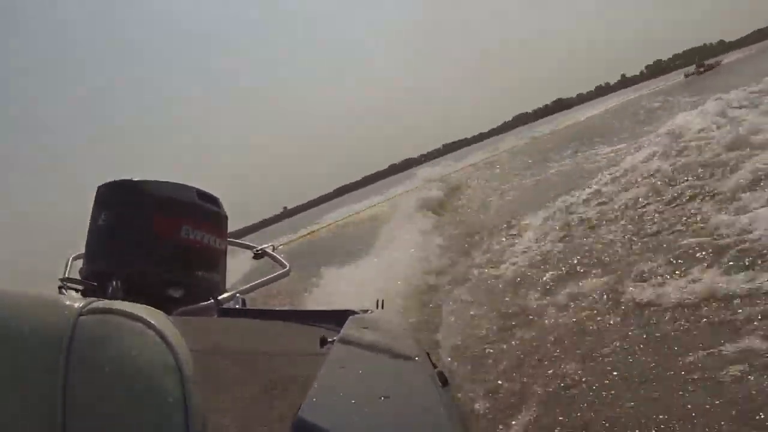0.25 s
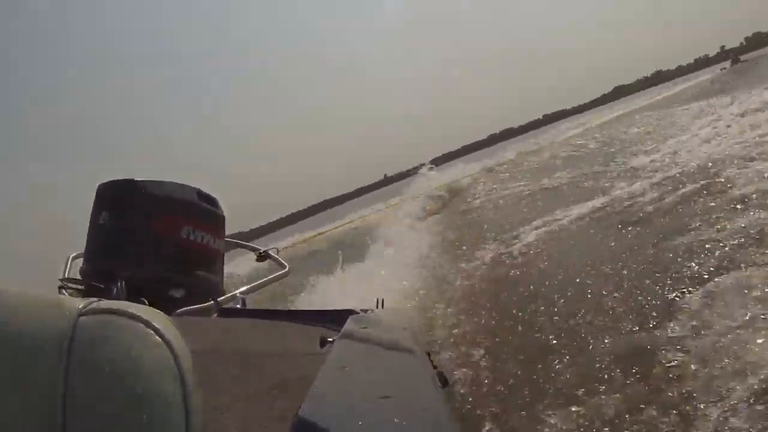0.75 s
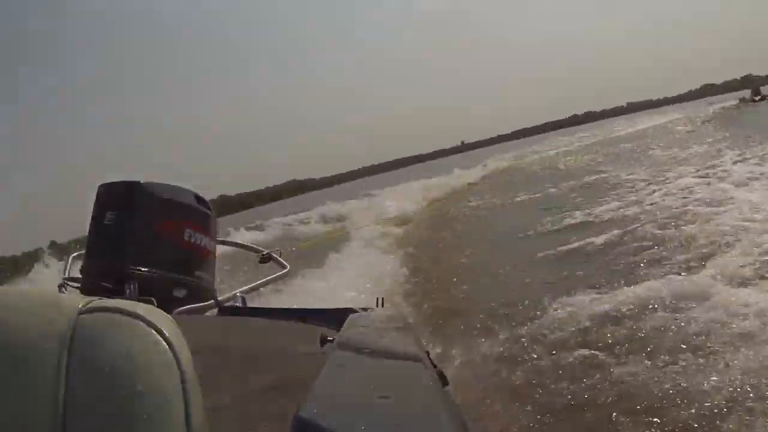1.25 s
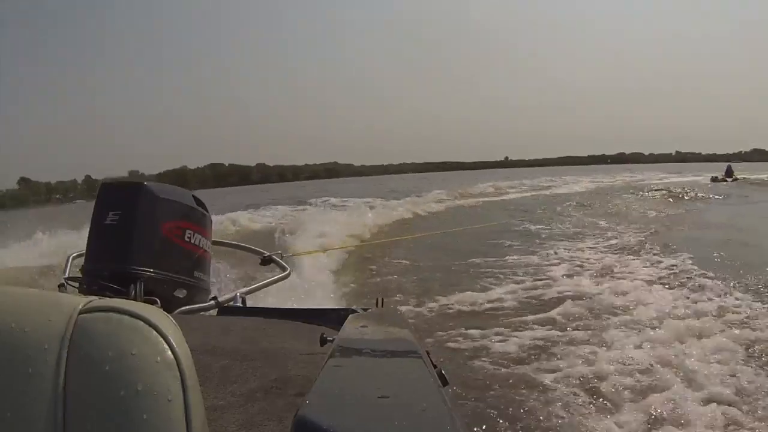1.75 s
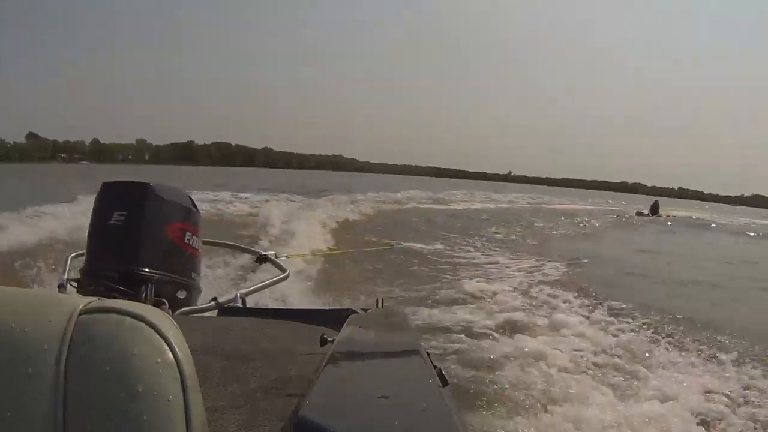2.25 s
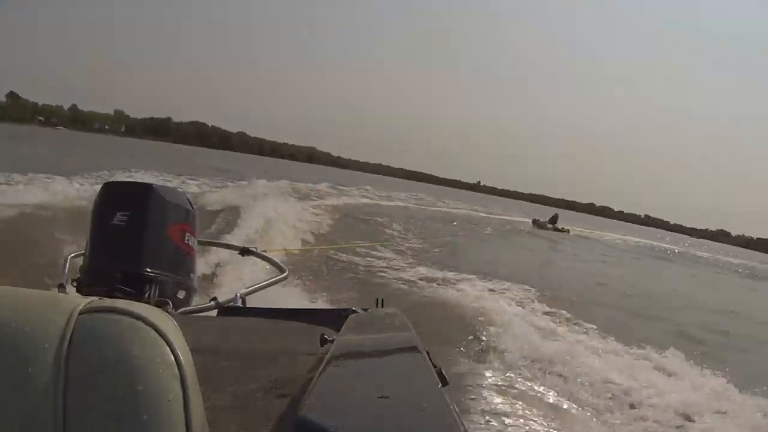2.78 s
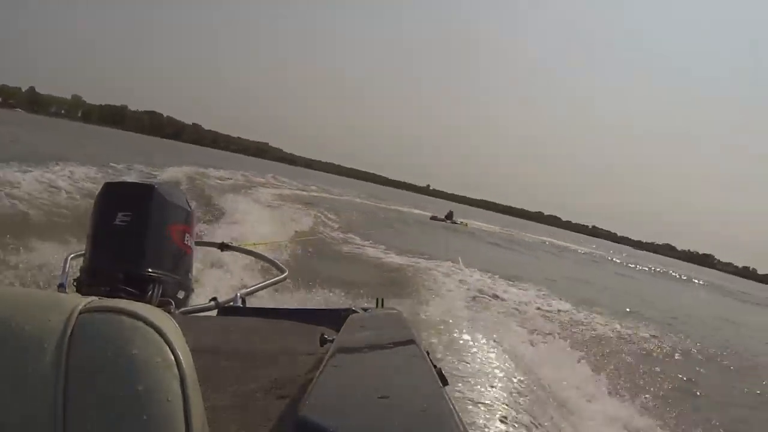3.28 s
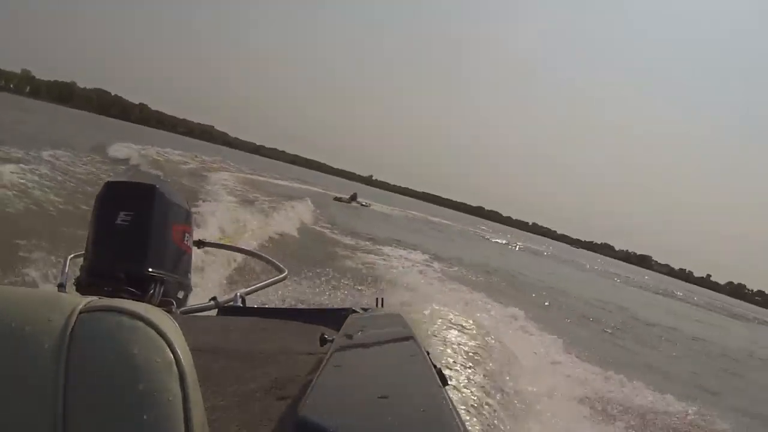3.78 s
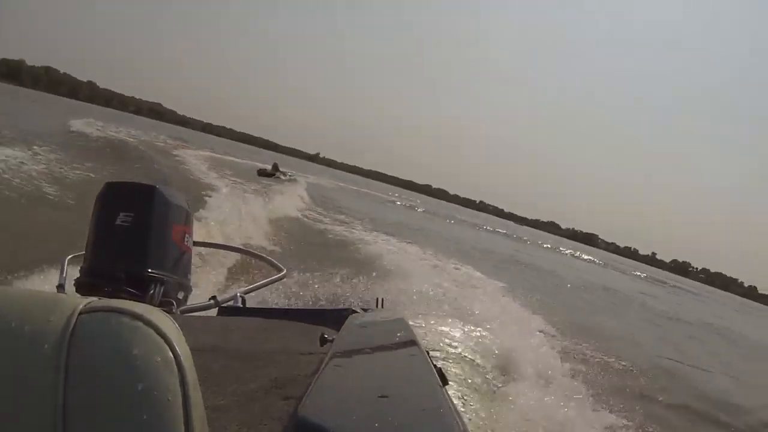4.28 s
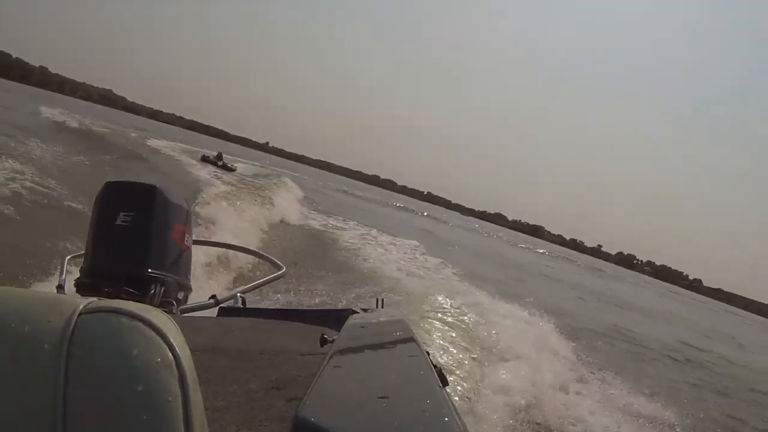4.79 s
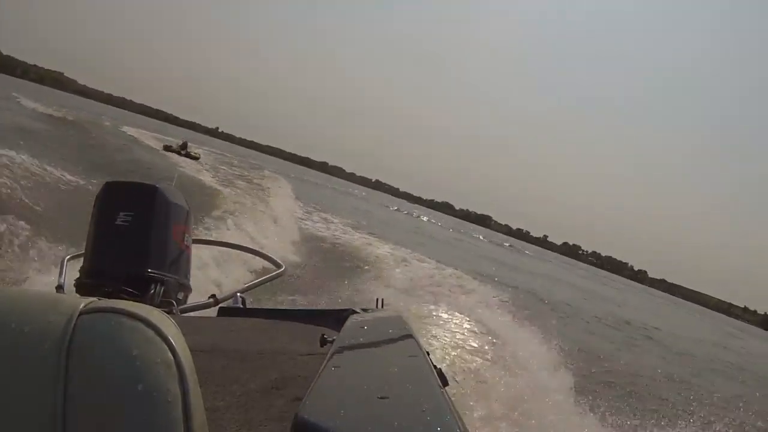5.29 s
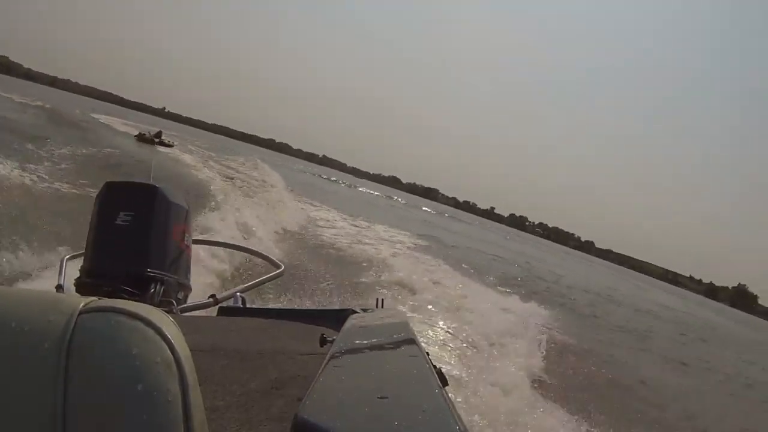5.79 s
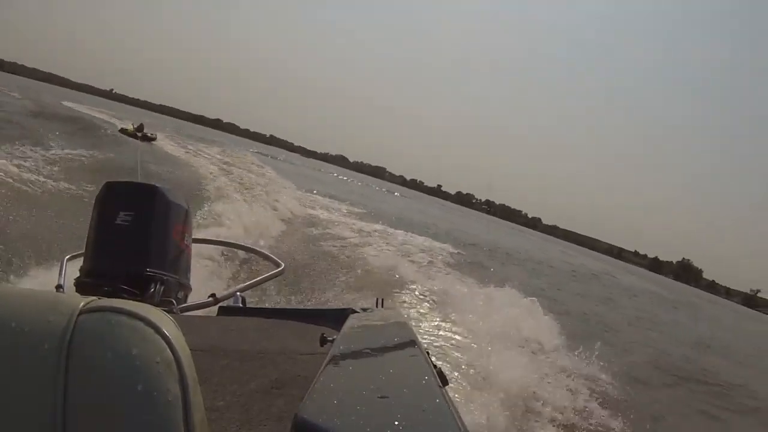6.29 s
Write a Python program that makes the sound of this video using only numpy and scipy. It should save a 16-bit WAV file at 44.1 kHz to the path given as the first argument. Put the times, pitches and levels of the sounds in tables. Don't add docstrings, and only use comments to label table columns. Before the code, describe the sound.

Inside a sealed camera case on a seat mount in an open motorboat, dense irregular knocks hammer for about a second and a half, each a low thump with a short hard plastic clack. They become sparse as the boat levels; the two-stroke outboard's buzzing drone swells, wake hiss rises thinly behind, the hull booms over waves, and a dull heavy slam lands at the very end.

```python
import sys
import numpy as np
from scipy import signal
from scipy.fft import rfft, irfft
from scipy.io import wavfile
from scipy.ndimage import uniform_filter1d

SR = 44100
rng = np.random.default_rng(int(sys.argv[2]) if len(sys.argv) > 2 else 0)


def makeup_ratio(level_db):
    decades = np.asarray(level_db, float) / 20
    return 10 ** decades


def to_wav(s):
    ch = np.atleast_2d(s).T
    pcm = np.round(np.clip(ch, -1, 1) * 32767)
    wavfile.write(sys.argv[1], SR, pcm.astype(np.int16))


N = 288409
FULL_DB = -21

# time in seconds, level in dB.
RIDE = [(0.0, -43), (0.16, -21), (0.31, -27), (1.16, -25), (1.35, -25.5), (1.89, -48), (2.18, -25),
        (2.31, -23), (2.55, -26), (2.71, -27), (2.97, -41), (3.2, -31.5), (4.15, -37.5), (4.5, -29),
        (4.66, -33), (5.57, -32), (5.94, -34.5), (6.54, -33)]
# frequency in Hz, level in dB, time to fall 60 dB in seconds.
BODY = [(138, -3.5, 0.11), (169.3, 2.5, 0.057), (197.7, -1.5, 0.091), (298, -5.5, 0.013)]
# frequency in Hz, level in dB, time to fall 60 dB in seconds.
SHELL = [(516, -20.5, 0.05), (680, 2, 0.015), (802, -2.5, 0.018), (1052, 1.5, 0.021), (1260, -7, 0.016),
         (1610, -6, 0.016), (1830, -14, 0.014), (2230, -3.5, 0.013), (2736, -10, 0.015),
         (3063, -21.5, 0.031), (4450, -16.5, .012), (5350, -17, 0.0085), (7200, -30, .005),
         (9240, -23.5, 0.0045), (10400, -22, 0.0036), (12770, -25, 0.0027), (14000, -21, .003)]


def evened(x):
    return x / np.sqrt(np.mean(abs(x) ** 2) + 1e-20)


def curves(rows):
    s, *columns = np.transpose(rows)
    return [np.interp(np.arange(N) / SR, s, c) for c in columns]


def read(points, hz):
    f, value = np.transpose(points)
    return np.interp(np.log(hz + 1), np.log(f + 1), value)


def wander(width_hz):
    rate = 400
    steps = rng.standard_normal((2, 3000))
    pole = np.exp(-np.pi * width_hz / rate)
    slow = evened(signal.lfilter([1], [1, -2 * pole, pole ** 2], steps[0] + 1j * steps[1]))
    return np.interp(np.arange(N) / SR * rate + 300, np.arange(3000), slow)


def noise(points, patchy_db, flicker_db, size):
    hop, hz = size // 4, np.fft.rfftfreq(size, 1 / SR)
    a, b, patches = rng.standard_normal((N // hop + 5, len(hz), 3)).T
    patches = uniform_filter1d(patches, size=6, axis=0)
    patches = evened(uniform_filter1d(patches, size=12, axis=1))
    flicker = evened(uniform_filter1d(rng.standard_normal(a.shape[1]), size=3))
    level_db = read(points, hz)[:, None] + patchy_db * patches + flicker_db * flicker
    z = (a + 1j * b) * makeup_ratio(level_db)
    return evened(signal.istft(z, nperseg=size, noverlap=size - hop)[1][:N])


def ring(modes, detune, rise):
    t = np.arange(4000) / SR
    sines = (makeup_ratio(db - 60 * t / t60) * np.sin(2 * np.pi * hz * d * t)
             for (hz, db, t60), d in zip(modes, detune))
    return (1 - np.exp(-t / rise)) * sum(sines)


def swells(rows, width):
    t = np.arange(N) / SR
    return sum(size * np.exp(-((t - s) / width) ** 2) for s, size in rows)


def panel_swells(rows):
    level_db, stretch = -6, 0.89
    t = np.arange(0, N, 50) / SR
    size = sum(makeup_ratio(db + level_db) * np.exp(-((t - s - length / 2) / (stretch * length / 2)) ** 2)
               for s, length, db in rows)
    return np.interp(np.arange(N) / SR, t, size)


def crank_orders(angle, speed, load_db):
    # multiple of crank speed, level in dB.
    crank = [(1, -5), (2, -6.5), (3, -6.5), (4, -41), (5, -1.5), (6, -4), (7, 4), (8, -3), (9, -17),
             (10, -39), (11, -12), (12, -9), (13, -9.5), (14, -11), (15, -33), (16, -22), (17, -34),
             (18, -22.5), (19, -50), (20, -51), (21, -51), (22, -23), (23, -31), (24, -19.5), (25, -24.5),
             (26, -24.5)]
    resonances = {5: (217.5, 6, -28, 0.5), 7: (311.5, 4, -20.5, 1.03), 11: (501, 5, -30.5, 1.6),
                  13: (606, 8, -30, 0.4), 14: (611.5, 12.5, -32.5, 0.34), 18: (804.5, 11, -38, 0)}
    # start in seconds, length in seconds, level in dB.
    side_panel = [(2.157, 0.097, -18.5), (2.366, 0.053, -28), (2.99, 0.049, -27), (3.072, 0.043, -16),
                  (3.337, 0.057, -19), (3.656, 0.059, -24), (3.784, 0.038, -27), (4.223, 0.16, -26),
                  (4.394, 0.15, -26), (4.641, 0.046, -20), (4.893, 0.054, -18.5), (4.967, 0.16, -20),
                  (5.142, 0.082, -29), (5.269, 0.058, -25), (5.368, 0.041, -30), (5.455, 0.034, -32),
                  (5.609, 0.03, -17), (5.654, 0.035, -15), (5.725, 0.041, -19), (5.82, 0.11, -25),
                  (5.91, 0.076, -23.5), (6.011, 0.026, -24), (6.218, 0.07, -16.5), (6.364, 0.14, -17)]
    # start in seconds, length in seconds, level in dB.
    deck = [(1.788, 0.054, -21), (1.971, 0.057, -24), (2.1, 0.144, -21), (2.388, 0.042, -22),
            (2.451, 0.21, -19), (2.669, 0.23, -19.5), (2.982, 0.066, -23), (3.403, 0.081, -24),
            (3.565, 0.072, -24), (3.723, 0.144, -20), (3.896, 0.034, -29), (4.02, 0.032, -25),
            (4.104, 0.053, -21), (4.237, 0.034, -26), (4.441, 0.067, -24), (4.595, 0.03, -26),
            (4.985, 0.05, -23), (5.056, 0.033, -26), (5.269, 0.038, -25), (5.348, 0.038, -26),
            (5.508, 0.11, -25), (5.61, 0.054, -20), (5.734, 0.19, -20), (6.081, 0.088, -22),
            (6.248, 0.04, -29), (6.325, 0.12, -25), (6.473, 0.034, -21)]
    singing = {13: side_panel, 5: deck}
    low, top, tones = np.zeros((3, N))
    for k, db in crank:
        turn = np.exp(1j * (k * angle + 2 * np.pi * rng.random()))
        drift = wander(width_hz=12)
        if k in resonances:
            hz, width, peak_db, share = resonances[k]
            lift = makeup_ratio(peak_db + share * load_db) / np.sqrt(1 + ((k * speed - hz) / width) ** 2)
            if k in singing:
                lift = lift + panel_swells(singing[k])
            tones += np.sqrt(2) * lift * (turn * (.98 + .15 * drift)).real
        elif k < 10:
            low += makeup_ratio(db) * (turn * (1.1 + 0.44 * drift)).real
        else:
            top += makeup_ratio(db) * (turn * (0.4 + 1.2 * drift)).real
    return low, top, tones


def propeller(angle):
    gear = 1.85
    # multiple of propeller speed, level in dB, wander in Hz.
    orders = [(3, -29, 7.3), (5, -33, 14)]
    return sum(makeup_ratio(db) * (np.exp(1j * k * angle / gear) * (1.12 + 0.43 * wander(width_hz=w))).real
               for k, db, w in orders)


def engine():
    # time in seconds, engine loudness reaching the seat in dB.
    load = [(0.0, -33.5), (0.16, -31), (0.31, -26), (0.46, -33), (0.89, -29.5), (1.26, -32.5), (1.49, -26),
            (1.66, -25), (1.99, -23), (2.93, -20), (3.08, -21.5), (3.88, -19), (4.9, -22.5), (5.1, -19.5),
            (6.25, -21.5), (6.54, -17.5)]
    # time in seconds, crank speed in Hz.
    crank_speed = [(0, 44.4), (1.4, 44.2), (1.8, 44.4), (2.3, 44.5), (2.8, 44.48), (3.0, 44.26),
                   (3.2, 44.4), (3.5, 44.8), (3.8, 45.0), (4.15, 44.64), (4.5, 45.14), (4.8, 44.76),
                   (5.1, 45.15), (5.45, 44.95), (6.0, 45.9), (6.22, 45.6), (6.38, 46.3), (6.54, 47.8)]
    # frequency in Hz, level in dB per Hz.
    hull = [(12, -37), (20, -23), (53, -23), (169, -22.5), (209, 1.5), (260, -13), (306, 5), (431, -20),
            (597, -3), (702, -21), (812, -15.5), (1060, -23), (1500, -31.5), (1950, -33.5), (3300, -120)]
    load_db, speed = curves(load)[0] - FULL_DB, curves(crank_speed)[0]
    roar_db = -19.5 + 0.93 * load_db
    rasp_db = -33.5 + 0.85 * load_db
    angle = 2 * np.pi * np.cumsum(speed) / SR
    low, top, tones = crank_orders(angle, speed, load_db)
    prop = propeller(angle)
    firing = 1 + 0.044 * np.cos(angle) + 0.043 * np.cos(2 * angle)
    roar = makeup_ratio(-1.5) * firing * noise(hull, patchy_db=1.0, flicker_db=1.5, size=2048)
    rasp_points = [(300, -6), (400, 0), (520, 2), (610, 7), (700, -9), (1100, -6), (1600, -33)]  # Hz, dB
    rasp = firing * noise(rasp_points, patchy_db=2.0, flicker_db=2.0, size=1024)
    lower = makeup_ratio(-5.0) * evened(low) + roar
    upper = makeup_ratio(-0.5) * evened(top) + makeup_ratio(-6.5) * rasp
    return makeup_ratio(roar_db) * lower + makeup_ratio(rasp_db) * upper + tones + makeup_ratio(0.13 * load_db) * prop


def knocks():
    # time in seconds, shell peak in dB, body in dB,
    # delay of the rebound in seconds (0 = none).
    hammering = [(-.0014, -26, -3, .0566), (.07, -30, -12, .0138), (.1092, -27, -11, .0282),
                 (.1505, -22.5, -4, .0154), (.1932, -26, -6.5, 0), (.2191, -20, -5, 0),
                 (.2336, -19, -4, .0141), (.2598, -21.5, -3.5, 0), (.2837, -18.5, -2, .0091),
                 (.3208, -27.5, -12, .0166), (.3614, -22, -4.5, 0), (.3891, -19, -2.5, .0229),
                 (.4345, -17.5, -5, .011), (.463, -19, -4, .0133), (.4995, -20.5, -5, .0088),
                 (.5227, -31, -11, .0246), (.6048, -23.5, -9, .0083), (.6309, -19, -1, .0343),
                 (.7178, -35, -8, .0082), (.7447, -20, -4.5, 0), (.7964, -29, -12, .0138),
                 (.83, -24, -9, .0088), (.8567, -18, -1, 0), (.8817, -23, -4.5, .0495),
                 (.9452, -21, -10, .0163), (.9685, -21, -9.5, .0144), (.9963, -24, -11, .0259),
                 (1.0466, -40, -6.5, .0089), (1.0635, -28, -18, .0134), (1.1357, -20.5, -5.5, .0257)]
    # time in seconds, shell peak in dB,
    # body in dB, delay of the rebound in seconds (0 = none).
    bumps = [(1.2057, -24.5, -10.5, .0265), (1.2471, -21, -7, 0), (1.2619, -20.5, -7, .0298),
             (1.3163, -26, -17, 0), (1.3593, -23.5, -9, .0143), (1.4213, -19.5, -6, .0245),
             (1.4644, -26, -20, .033), (1.5055, -23, -7.5, .0296), (1.8817, -25, -29, 0),
             (2.178, -22.5, -21, 0), (2.218, -21, -7, 0), (2.2479, -19.5, -8, 0),
             (2.2953, -20.5, -10, .0364), (2.5866, -21, -19, 0), (2.6564, -19.5, -7, 0),
             (2.9932, -19, -5, .0035), (3.078, -26, -19, 0), (3.1239, -18.5, -6, .004),
             (3.2311, -23, -8, 0), (3.2496, -19, -9, 0), (3.3753, -20.5, -7, 0), (3.4072, -20, -9, 0),
             (3.51, -23, -18, .0299), (3.7524, -19.5, -12, 0), (3.9071, -23.5, -6, 0),
             (3.9984, -19, -12, 0), (4.2114, -20.5, -22, 0), (4.9931, -17.5, -6, .0394),
             (5.248, -26.5, -20, 0), (6.3266, -33, -20, 0)]
    # time in seconds, peak in dB.
    light_taps = [(0.573, -33), (0.685, -24), (1.379, -20.5), (1.492, -24.5), (2.101, -31), (2.3673, -16),
                  (2.4094, -18), (2.4603, -23), (2.498, -37), (2.9378, -18), (3.3348, -18), (3.95, -36),
                  (4.2776, -18), (4.3477, -16), (4.3883, -22), (4.4493, -16), (4.7465, -24), (5.016, -27),
                  (5.0783, -32), (5.191, -39), (5.6203, -25), (5.9295, -33), (1.533, -42), (3.18, -26),
                  (3.4649, -21), (3.8654, -23), (4.046, -24), (5.3077, -19), (5.8889, -24)]
    tap_shell_db, tap_body_db = -8.5, -33
    rebound_shell_db, rebound_body_db, rebound_share = -27, -11, 0.22
    push_db, push_s, push_after_s = 8.5, 0.00065, 0.0038
    shell_lag_s = .0003

    hits = [row[:3] for row in hammering + bumps]
    for s, shell_db, _, gap in hammering + bumps:
        if gap:
            light_db = rebound_shell_db + rebound_share * (shell_db - rebound_shell_db)
            hits.append((s + gap, light_db, rebound_body_db))
    hits += [(s, db + tap_shell_db, tap_body_db) for s, db in light_taps]

    lead = 100
    out, t = np.zeros(N + 9000), np.arange(600) / SR
    push = np.exp(-((np.arange(4000) / SR - push_after_s) / push_s) ** 2)
    for s, shell_db, body_db in hits:
        detune = rng.standard_normal(len(SHELL) + len(BODY))
        chatter = rng.standard_normal(len(t)) * (rng.random(len(t)) < 700 / SR)
        blows = chatter * .4 * makeup_ratio(-60 * t / .04)
        struck_db = 2 * rng.standard_normal(len(SHELL))
        modes = [(hz, db + more, t60) for (hz, db, t60), more in zip(SHELL, struck_db)]
        shell = ring(modes, 1 + .04 * detune[len(BODY):], rise=.00033)
        shell = shell + signal.fftconvolve(blows, shell)[:len(shell)]
        shell = makeup_ratio(shell_db + 5.0) * shell / np.sqrt(1 + np.sum(blows ** 2))
        body = ring(BODY, 1 + .025 * detune, rise=.001)
        body = makeup_ratio(body_db - 7.0) * body - makeup_ratio(shell_db + push_db) * push
        out[round((s + shell_lag_s) * SR) + lead:][:len(shell)] += shell
        out[round(s * SR) + lead:][:len(body)] += body
    low_cut = signal.butter(2, 75, "high", fs=SR, output="sos")
    return signal.sosfilt(low_cut, out)[lead:][:N]


def mount():
    # start in seconds, length in seconds, level in dB, pitch in Hz.
    sways = [(-.05, 0.57, -16.5, 38.74), (.29, 0.3, -13, 36.8), (0.54, 0.5, -12, 36.9),
             (1.075, 0.26, -21.5, 36.9), (1.294, 0.34, -31, 34.8), (1.554, 0.051, -30, 32.6),
             (1.66, 0.38, -24.5, 33), (2.013, 0.067, -24, 33.9), (2.08, 0.12, -23, 34),
             (2.18, 0.085, -19, 34.3), (2.294, 0.35, -18.5, 33.96), (2.48, 0.69, -16, 33.98),
             (3.177, 0.24, -20, 36), (3.357, 0.13, -24, 34.6), (3.444, 0.46, -17, 34.5),
             (3.797, 0.08, -29, 35.2), (3.875, 0.89, -13, 32.92), (4.633, 0.025, -37, 38.3),
             (4.71, 0.39, -26, 36.5), (4.98, 0.47, -17, 34.7), (5.455, 0.81, -16.5, 32.8),
             (6.196, .15, -31, 30.8), (6.348, 0.65, -21, 33.14)]
    t = np.arange(N) / SR
    start, length, db, hz = np.transpose(sways)
    size = np.zeros(N)
    for s, l, d in zip(start, length, db):
        half_sine = np.sin(np.pi * np.clip((t - s) / l, 0, 1)).clip(0)
        size += makeup_ratio(d) * half_sine ** 0.76
    pitch = np.interp(t, start + length / 2, hz)
    sway = np.sqrt(2) * size * np.exp(2j * np.pi * np.cumsum(pitch) / SR)
    sway = (sway * (0.72 + 0.33 * wander(width_hz=8.3))).imag
    thump = ring(BODY, np.ones(len(BODY)), rise=0.0087)
    drone = signal.oaconvolve(rng.standard_normal(N), thump)[:N]
    return sway + makeup_ratio(curves(RIDE)[0] + 2) * evened(drone)


def rattle():
    heights_db = 4.5 * np.minimum(rng.exponential(1, (4, N)), 3.5)
    taps = makeup_ratio(heights_db) * (rng.random((4, N)) < 80 / SR)
    parts = 1 + .06 * rng.standard_normal((4, len(SHELL)))
    buzz = sum(signal.oaconvolve(x, ring(SHELL[2:], d, rise=0.00021))[:N] for x, d in zip(taps, parts))
    return makeup_ratio(-34.5 + 0.46 * (curves(RIDE)[0] - FULL_DB)) * evened(buzz)


def booms():
    # time in seconds, level in dB.
    waves = [(1.62, -26.5), (2.5, -41), (3.0, -37), (3.14, -23.5), (3.359, -22), (3.61, -25), (3.75, -25.5),
             (4.01, -25.5), (4.49, -27), (4.99, -29.5), (6.109, -27)]
    boom_hz, boom_s = 118.6, 0.092
    size = swells([(s, makeup_ratio(db)) for s, db in waves], boom_s)
    note = np.exp(2j * np.pi * boom_hz * np.arange(N) / SR)
    return np.sqrt(2) * size * (note * (1 + .25 * wander(width_hz=4.5))).real


def thuds():
    # start in seconds, length in seconds, level in dB, pitch in Hz.
    slams = [
        (6.486, 0.018, -2.5, 239),
        (6.507, .022, -9.5, 305),
        (1.5, 0.03, -18, 240),
    ]
    out = np.zeros(N + SR)
    for s, length, db, hz in slams:
        t = np.arange(0, length, 1 / SR)
        note = np.hanning(len(t)) * np.sin(2 * np.pi * hz * t)
        out[round(s * SR):][:len(t)] += np.sqrt(2) * makeup_ratio(db - 3) * note
    return out[:N]


def slaps():
    # time in seconds, level in dB, length in seconds.
    throws = [
        (.764, -16.5, .007),
    ]
    t = np.arange(N) / SR
    # Hz, dB, seconds to fall 60 dB
    wet_shell = [(1100, 8, 0.01), (1420, 0, 0.0098), (2400, -12, 0.02), (2600, 8.5, 0.0062),
                 (4330, -17.0, 0.0095), (5570, -11.5, 0.0071), (9000, -30, .003)]
    ringing = ring(wet_shell, np.ones(7), rise=0.00038)
    wet = rng.standard_normal(N) / np.linalg.norm(ringing)
    out = np.zeros(N)
    for s, db, length in throws:
        burst = np.clip((t - s) / 0.00037, 0, 1) * makeup_ratio(-60 * np.maximum(t - s - length, 0) / 0.0023)
        out += makeup_ratio(db) * signal.oaconvolve(wet * burst, ringing)[:N]
    return out


def wake():
    # frequency in Hz, level in dB.
    spray = [(700, 0), (1500, -3), (2500, 4), (3500, -0.5), (4250, -2.5), (4680, -0.5), (5500, -6),
             (7200, -6.5), (9000, -13), (10500, -16), (12500, -17)]
    # time in seconds, spray level in dB.
    spray_level = [(0.0, -64.5), (0.29, -60), (1.2, -68), (1.48, -62), (1.6, -62), (1.82, -56.5),
                   (2.22, -53), (2.77, -50.5), (3.64, -51), (4.17, -49.5), (4.48, -53), (4.9, -50.5),
                   (5.03, -53.5), (5.3, -53.5), (5.54, -52), (6.06, -53.5), (6.21, -52.5), (6.54, -52.5)]
    # time in seconds, rise over the wake in dB.
    surges = [(1.62, 5.5), (2.07, 1.5), (2.36, 3.5), (2.66, 2), (2.92, 3.5), (3.57, 5), (4.3, 2),
              (5.47, 2.5), (5.85, 2), (6.16, 4.5)]
    hiss = noise(spray, patchy_db=1.3, flicker_db=0.78, size=256)
    drops = makeup_ratio(3.0 * np.minimum(rng.exponential(1, N), 5)) * (rng.random(N) < 600 / SR)
    drop_decay = makeup_ratio(-60 * np.arange(300) / SR / 0.0099)
    drops = evened(signal.oaconvolve(drops, drop_decay)[:N])
    level_db = curves(spray_level)[0] + swells(surges, 0.074) + 11.5
    return makeup_ratio(level_db) * hiss * (1 + 0.079 * drops)


def scene():
    boat = engine() + knocks() + mount() + rattle() + booms() + thuds()
    water = slaps() + wake()
    return (boat + water)[None]


def sealed_case(dry):
    # frequency in Hz, width in Hz, depth in dB.
    notches = [(916, 13, -16.5), (1920, 250, -2.5), (3835, 270, -5), (4920, 73, -10), (5870, 160, -6.5),
               (6450, 320, -7), (8020, 380, -4), (11030, 490, -5.5)]
    # frequency in Hz, level in dB.
    port = [(12900, 0), (13300, -7), (14400, -6), (15200, -13), (16000, -40)]
    wide = np.pad(dry, [(0, 0), (2048, 2048)], "reflect")
    hz = np.fft.rfftfreq(wide.shape[1], 1 / SR)
    dips_db = sum(db * np.exp(-((hz - f) / w) ** 2) for f, w, db in notches)
    return irfft(rfft(wide) * makeup_ratio(dips_db + read(port, hz)), wide.shape[1])[:, 2048:-2048]


def gain_control(cased):
    duck_from_db, duck_share, recover_db_per_s = -14.5, 0.15, 27
    power = uniform_filter1d(cased[0] ** 2, size=300, origin=149)
    power_db = 10 * np.log10(abs(power) + 1e-12)
    fall = np.arange(N) * recover_db_per_s / SR
    held_db = np.maximum.accumulate(power_db + fall) - fall
    over_db = np.maximum(held_db - duck_from_db, 0)
    return cased / makeup_ratio(duck_share * uniform_filter1d(over_db, size=400, origin=199))


def band_limit(x):
    return signal.sosfilt(signal.butter(12, 15180, fs=SR, output="sos"), x)


def record(dry):
    ducked = gain_control(sealed_case(dry))
    soft = 1.1 * np.tanh(ducked / 1.1)
    return band_limit(soft)


dry = scene()
out = record(dry)
to_wav(out)
```